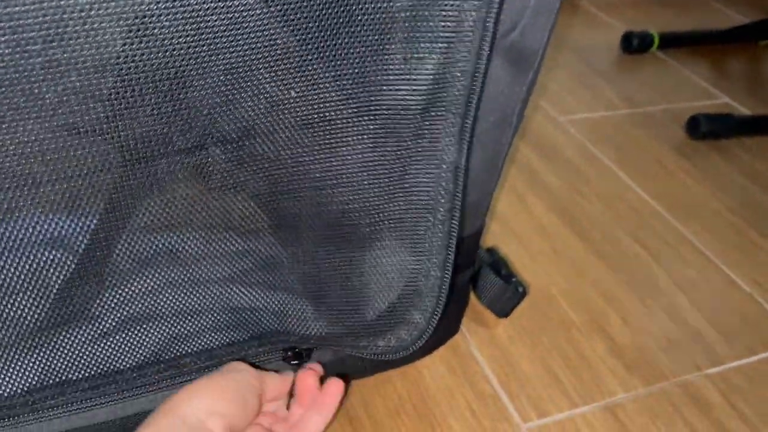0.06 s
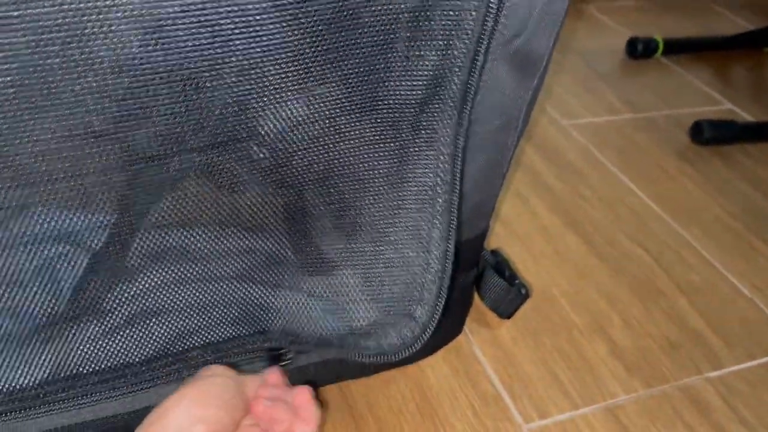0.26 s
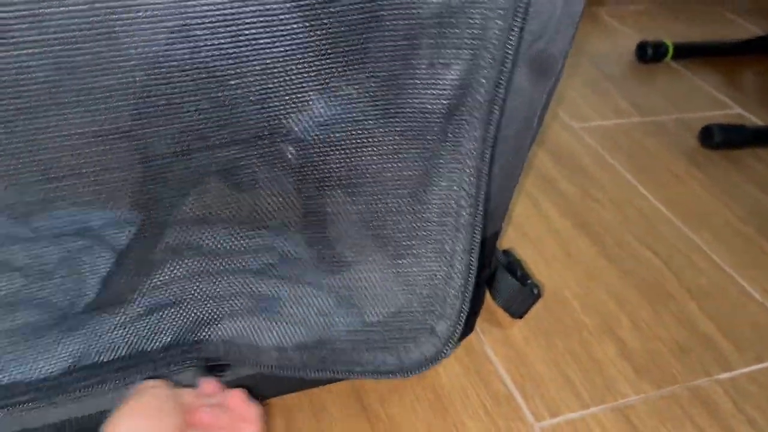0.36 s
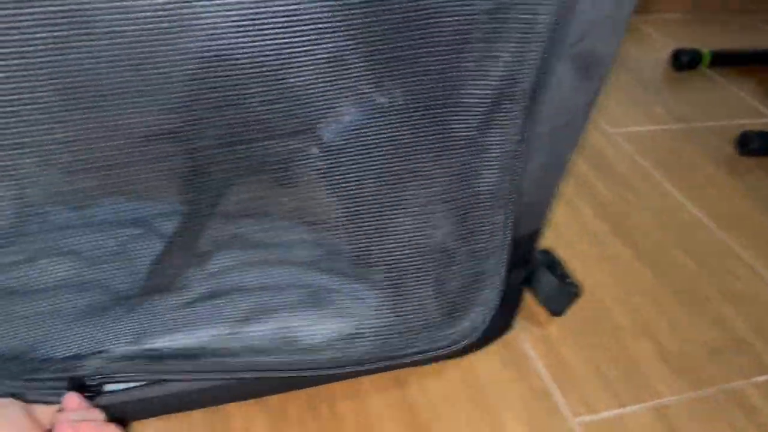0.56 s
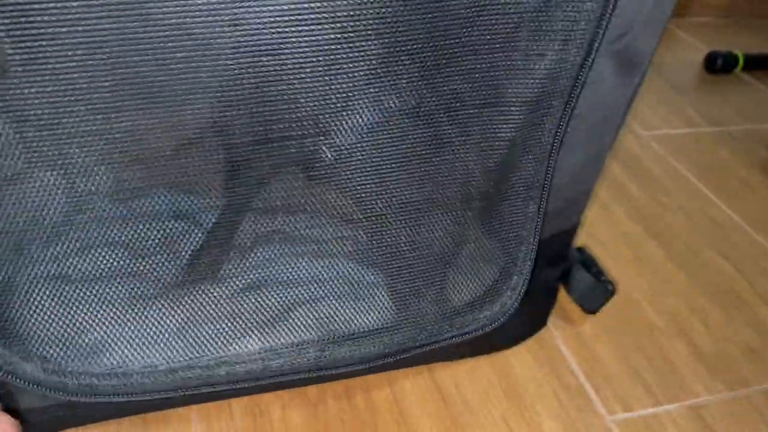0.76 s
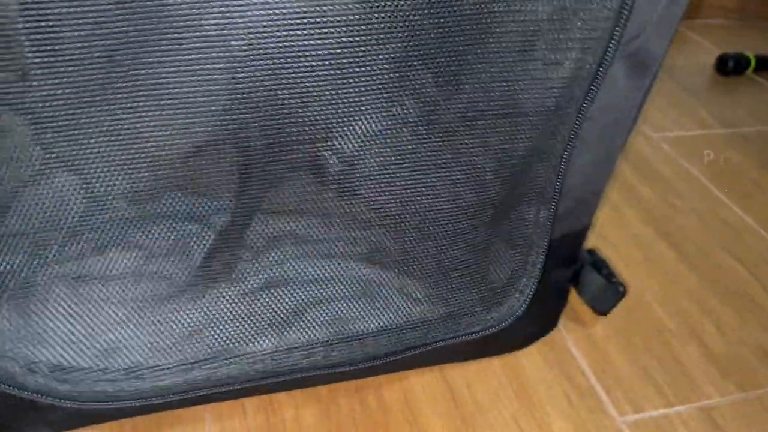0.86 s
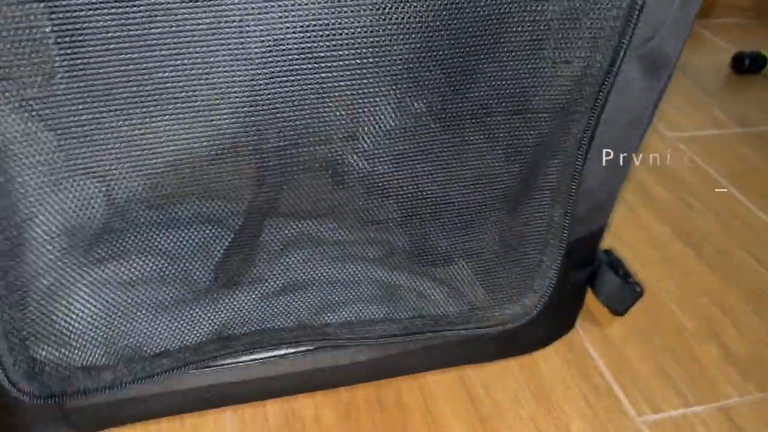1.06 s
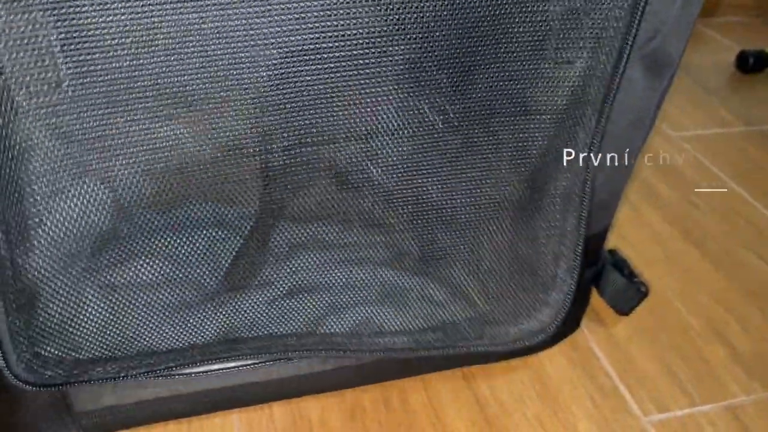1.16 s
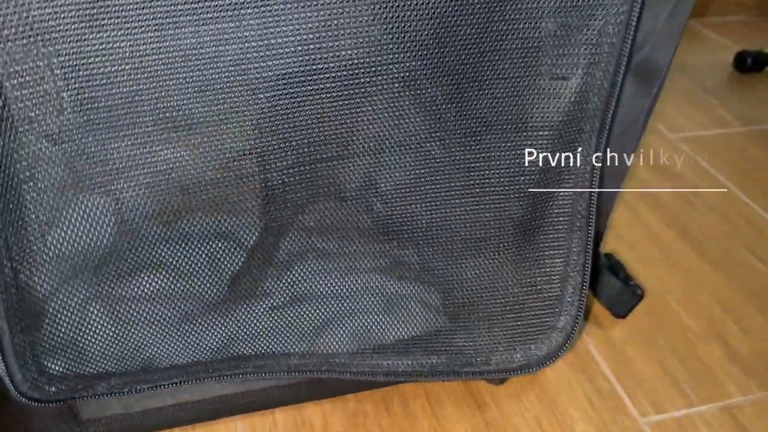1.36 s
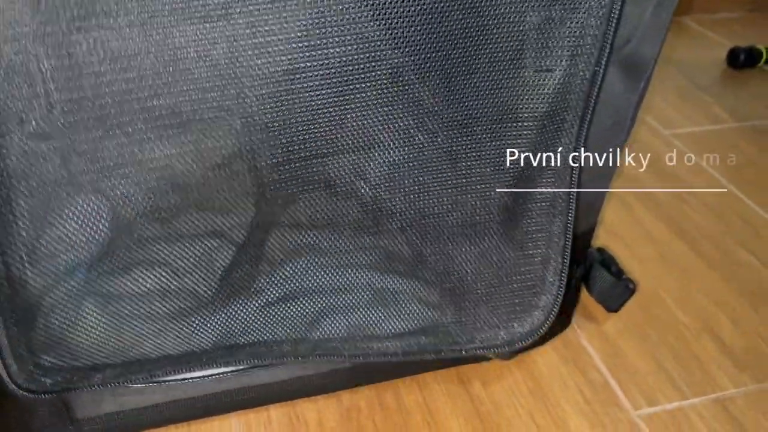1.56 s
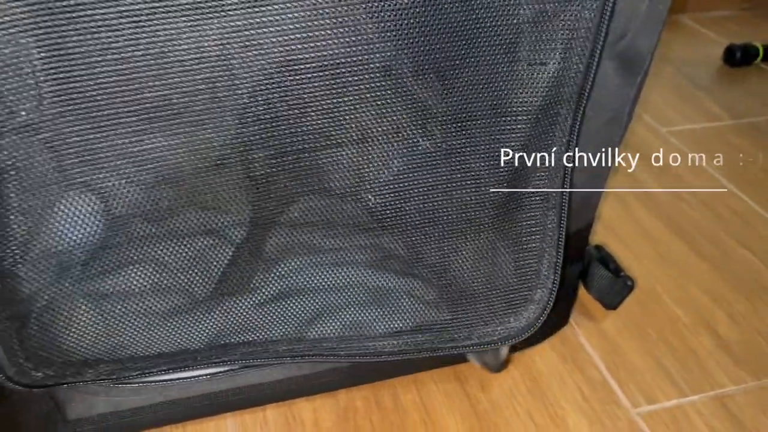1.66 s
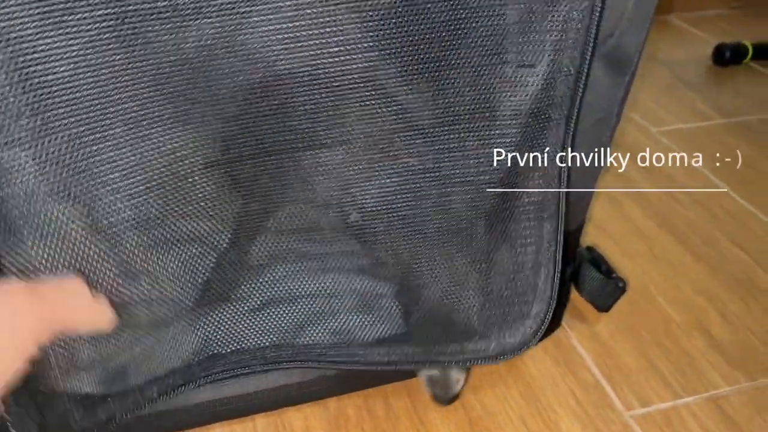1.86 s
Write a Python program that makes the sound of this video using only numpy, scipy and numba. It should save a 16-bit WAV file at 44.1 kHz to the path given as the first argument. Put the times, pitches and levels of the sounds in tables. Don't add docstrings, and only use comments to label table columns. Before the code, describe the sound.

A zipper on a fabric crate door opens close to a handheld microphone in a small, softly humming room. Faint finger ticks and rustle come first. From 0.2 to 0.65 seconds it buzzes, then teeth pop unevenly with a low thump near 0.74. A faster, brighter stroke runs from 0.85 to 1.27. The flap thuds softly; around 1.5 the tab clinks and cloth rustles.

```python
import sys
import numpy as np
from scipy import signal
from scipy.fft import rfft, irfft
from scipy.io import wavfile
from scipy.ndimage import uniform_filter1d, map_coordinates
from numba import njit

SR = 44100
rng = np.random.default_rng(int(sys.argv[2]) if len(sys.argv) > 2 else 0)


def boost_factor(decibels):
    exponent = np.asarray(decibels, float) / 20
    return 10 ** exponent


def dump(signal):
    limited = np.clip(np.atleast_2d(signal).T, -1, 1)
    pcm = np.round(limited * 32767).astype(np.int16)
    wavfile.write(sys.argv[1], SR, pcm)


N = 83790

SCRAPE_GATE_S = .008


def noise():
    return rng.standard_normal(N)


def level(x, db):
    return x * boost_factor(db) / np.sqrt(np.mean(x ** 2))


def colour(x, points):
    hz, db = np.array(points, float).T
    log_hz = np.log(np.linspace(1, SR / 2, 2049))
    cepstrum = irfft(np.interp(log_hz, np.log(hz), db) * np.log(10) / 20)
    cepstrum[1:2048] *= 2
    cepstrum[2049:] = 0
    response = irfft(np.exp(rfft(cepstrum)))
    return signal.fftconvolve(x, response)[:N]


def band(x, hz, width):
    return signal.lfilter(*signal.iirpeak(hz, hz / width, SR), x)


@njit
def glide(x, hz, q):
    y, b, l = np.empty(len(x)), 0., 0.
    for i in range(len(x)):
        g = np.tan(np.pi * hz[i] / SR)
        v = (b + g * (x[i] - l)) / (1 + g * (g + 1 / q))
        b, l, y[i] = 2 * v - b, l + 2 * g * v, v / q
    return y


def fade(x, tau_s):
    return signal.lfilter([1], [1, -np.exp(-1 / (tau_s * SR))], x)


def strikes(times, sizes):
    samples = (np.asarray(times) * SR).astype(int)
    return np.bincount(samples, np.broadcast_to(sizes, np.shape(times)), N)[:N]


def ring(t, hz, t60):
    return (t > 0) * np.sin(2 * np.pi * hz * t) * np.exp(-np.log(1000) * np.abs(t) / t60)


def walk(size):
    return level(uniform_filter1d(uniform_filter1d(noise(), size), size), 0)


def follow(t, table):
    at, *columns = np.array(table).T
    return [np.interp(t, at, column) for column in columns]


def hum():
    # pitch_hz, level_db
    hum_colour = [(30, -22.5), (50, 10), (100, -7.5), (145, 1), (400, -16), (5500, -33), (11000, -32),
                  (12300, -52)]
    swell = boost_factor(2.8 * level(uniform_filter1d(noise(), size=4000), 0))
    return level(colour(noise(), hum_colour), -53.5) * swell


def room(t, x):
    t60_s, gap_s, room_db = 0.23, 0.0035, -11
    # pitch_hz, level_db
    room_colour = [(100, 14.5), (400, 6), (900, 3.5), (3000, 0), (6000, 2.5), (12000, -5.5)]
    tail = noise() * (t > gap_s) * np.exp(-np.log(1000) * t / t60_s)
    tail = tail / np.sqrt(np.sum(tail ** 2))
    return boost_factor(room_db) * signal.fftconvolve(colour(x, room_colour), tail)[:N]


def cloth_rustle(t):
    # start_s, length_s, level_db
    moves = [
        (0, 0.007, -56),
        (0.082, 0.37, -60),
        (1.501, 0.085, -51),
        (1.572, 0.081, -51.5),
        (1.65, 0.068, -71),
        (1.769, 0.032, -62),
    ]
    # pitch_hz, level_db
    cloth_colour = [(200, 5.5), (600, 7.5), (1500, 3), (2800, -7), (5000, -8.5), (9000, -6.5), (11500, 6.5),
                    (13500, -43)]
    grains = noise() * boost_factor(3.3 * uniform_filter1d(noise(), size=100) * 10)
    shape = 0
    for at, length, db in moves:
        rise = np.clip((t - at) / 0.0024, 0, 1)
        fall = np.clip(1 - (t - at - length) / 0.052, 0, 1) ** 2
        shape = shape + boost_factor(db) * rise * fall
    return shape * level(colour(grains, cloth_colour), 0)


def flap_thumps(t):
    # start_s, peak_db, pitch_hz, t60_s
    thumps = [
        (0.736, -13, 319, 0.061),
        (1.269, -22.5, 166, 0.036),
        (1.259, -22, 309, .05),
        (1.277, -41.5, 76.5, 0.086),
        (1.307, -39, 183, .1),
        (1.325, -35, 169, 0.048),
        (1.352, -45, 181, 0.11),
        (1.568, -44, 152, 0.063),
        (1.625, -33.5, 307, 0.072),
    ]
    out = 0
    for at, db, hz, t60 in thumps:
        soft_start = np.clip((t - at) / 0.0055, 0, 1)
        out = out + boost_factor(db) * ring(t - at, hz, t60) * soft_start
    return out


def finger_ticks():
    # start_s, peak_db, centre_hz, length_s
    ticks = [(0.0572, -27.5, 11200, 0.00038), (0.1145, -36.5, 8400, 0.0015), (0.117, -45, 2140, 0.0022),
             (0.180, -38.5, 3340, .0008), (0.187, -38, 1480, 0.001), (1.442, -34.5, 2230, 0.0017),
             (1.509, -37.5, 6050, 0.0058), (1.511, -35, 2560, 0.0046), (1.528, -54.5, 6040, 0.00072),
             (1.558, -28.5, 7800, 0.0041), (1.583, -38.5, 2490, 0.014), (1.61, -40, 2860, 0.022),
             (1.745, -44, 4400, 0.0036)]
    out = 0
    for at, db, hz, length in ticks:
        burst = fade(strikes([at], 1.), length) * np.sign(noise())
        tick = band(burst, hz, 0.39 * hz)
        out = out + boost_factor(db) * tick / np.abs(tick).max()
    return out


def tab_ring(t):
    struck_s = 1.514
    # pitch_hz, level_db, t60_s
    tab_modes = [(4300, -39, 0.08), (4210, -45, 0.033), (8290, -36, 0.015), (10900, -36, 0.02),
                 (2190, -41, 0.029)]
    return sum(boost_factor(db) * ring(t - struck_s, hz, t60) for hz, db, t60 in tab_modes)


def teeth(t):
    wobble, jitter, smooth_rate = .011, .02, 220
    # time_s, teeth_per_s
    speed = [(.251, 145), (.275, 197), (.316, 224), (.374, 212), (.442, 240), (.488, 227), (.51, 199),
             (.572, 198), (.604, 213), (.645, 156), (.846, 195), (.9, 281), (.936, 338), (1.045, 310),
             (1.075, 251), (1.138, 241), (1.204, 254), (1.263, 170)]
    # start_s, end_s
    stall = (.647, .8505)
    single_teeth = [.202, 0.221, 0.2339, 0.243, .651, 0.659, 0.668, .682, .693, 0.701, 0.7092, 0.716, 0.72,
                    .726, 0.7296, 0.734, 0.7378, 0.7388, 0.742, 0.7468, 0.7506, 0.7543, 0.7604, 0.7657,
                    0.7718, 0.7781, .7853, 0.7919, 0.7989, .8046, 0.8114, 0.8164, 0.823, 0.829, 0.8348,
                    0.8397, .8457, .8508, 1.268]
    at, rate = np.array(speed).T
    moving = (t >= at[0]) & (t < at[-1]) & ((t < stall[0]) | (t > stall[1]))
    pace = np.interp(t, at, rate) * (1 + wobble * walk(size=700)) * moving
    passed = np.floor(np.cumsum(pace) / SR + .98)
    run = t[1:][np.diff(passed) > 0]
    uneven = smooth_rate ** 2 / np.interp(run, at, rate) ** 3
    run = run + jitter * rng.standard_normal(len(run)) * uneven
    return np.concatenate([single_teeth, run])


def mesh_thumps(t, push):
    slack_db = 1.8
    # pitch_hz, width_hz, level_db
    frame_modes = [(188, 92, -6), (321.5, 52, 4), (492, 39, -4), (624, 32, -8), (737, 70, -8.5),
                   (961, 99, -2), (1117, 175, -3), (1423, 630, -7)]
    # time_s, frame_db, panel_hz, panel_db
    mesh_course = [(.2, -35.5, 830, -41), (.25, -41, 420, -26.5), (.31, -35.5, 636, -31),
                   (.4, -44.5, 470, -25), (.48, -35.5, 510, -30), (.52, -35, 564, -32.5),
                   (.62, -36, 566, -29), (.66, -38, 410, -26), (.72, -40, 421, -23),
                   (.77, -30.5, 243, -30.5), (.81, -36.5, 515, -32), (.89, -37.5, 926, -31),
                   (.94, -31, 680, -36), (1.0, -40, 960, -27.5), (1.05, -41, 914, -27.5),
                   (1.1, -35.5, 796, -36), (1.2, -38.5, 487, -34), (1.275, -30, 292, -39.5)]
    frame_db, panel_hz, panel_db = follow(t, mesh_course)
    push = level(push, 0) + level(fade(push, SCRAPE_GATE_S) * noise(), -13)
    frame = 0
    for k, (hz, width, db) in enumerate(frame_modes):
        jerks = push * boost_factor(frame_db + slack_db * walk(size=900))
        frame = frame + (-1) ** k * boost_factor(db) * band(jerks, hz, width)
    frame = signal.sosfilt(signal.butter(2, 150, "high", fs=SR, output="sos"), frame)
    panel = glide(push * boost_factor(panel_db), panel_hz, 4.37)
    return boost_factor(14.0) * frame + boost_factor(14.5) * panel


def tooth_burst(hits, scrape_db):
    snap_s, roughness = .00032, .13
    tail = fade(fade(hits, snap_s), snap_s / 2)
    click = hits + roughness * tail * np.sign(noise())
    scrape = fade(hits, SCRAPE_GATE_S) * noise()
    return level(click, 0) + level(scrape, scrape_db)


def tooth_snaps(t, hit, knock):
    snap_scrape_db, knock_scrape_db = -6.5, 2
    # time_s, snap_db, dullness_db
    pull = [(0.2, -31.5, 3), (0.208, -33.5, 4), (0.3, -27, 3.5), (0.402, -36, 9.5), (0.602, -30.5, 5.5),
            (0.696, -28.5, 0.5), (0.734, -25, 0), (0.78, -33, 7.5), (0.94, -26, 0.5), (1.006, -30.5, 3.5),
            (1.028, -26, 2.5), (1.174, -24.5, 0), (1.18, -22, 0.5), (1.25, -22, -4.5), (1.27, -29, 1.5),
            (1.275, -30, 6.5)]
    # pitch_hz, level_db
    snap_colour = [(900, -40.5), (5500, -22), (7200, -18.5), (8700, 0.5), (11300, -3.5), (13000, -7.5),
                   (14500, -13.5), (15500, -4.5)]
    # pitch_hz, level_db
    knock_colour = [(500, -21.5), (1000, -7), (1600, -6.5), (2700, -4.5), (4000, -5.5), (5500, -9.5),
                    (7000, -5), (9000, -8.5)]
    # time_s, pitch_hz, level_db
    hollow = [
        (.2, 3240, -3),
        (.35, 3560, 3.5),
        (.5, 2620, -21),
        (.72, 1610, -24.5),
        (.82, 9030, 8),
        (.93, 5900, -4.5),
        (1.05, 7400, -1.5),
        (1.189, 2530, -21.5),
        (1.249, 5730, 1.5),
    ]
    # pitch_hz, width_hz, level_db
    slider_modes = [(8400, 1400, -13), (10960, 520, -9.5), (11800, 810, -16)]
    snap_db, dull_db = follow(t, pull)
    snap = level(colour(tooth_burst(hit, snap_scrape_db), snap_colour), -2.95)
    dull = level(colour(tooth_burst(knock, knock_scrape_db), knock_colour), -9) * boost_factor(dull_db)
    hollow_hz, hollow_db = follow(t, hollow)
    cupped = glide(level(tooth_burst(hit, knock_scrape_db), 0), hollow_hz, 4.) * boost_factor(hollow_db)
    body = 0
    for hz, width, db in slider_modes:
        body = body + level(band(tooth_burst(hit, snap_scrape_db), hz, width), db)
    return boost_factor(snap_db) * (snap + dull + cupped + body)


def floor_echo(t, x):
    # time_s, lag_ms, level_db
    bounce = [(.2, .45, -14), (.3, .37, -11), (.58, .39, -11), (.66, .57, -13), (.73, .57, -14),
              (.76, .38, -12), (.82, .33, -8), (.88, .5, -5), (.96, .72, -6), (1.0, .8, -16),
              (1.06, .33, -16), (1.1, .33, -12), (1.27, .35, -13)]
    lag_ms, echo_db = follow(t, bounce)
    late = map_coordinates(x, [(t - lag_ms / 1000) * SR], mode="nearest")
    return boost_factor(echo_db) * late


def zipper(t):
    when = teeth(t)
    scatter_db = (1.2, 1.2, 1.8)
    hit, knock, push = (strikes(when, boost_factor(db * rng.standard_normal(len(when)))) for db in scatter_db)
    bright = tooth_snaps(t, hit, knock)
    return bright + floor_echo(t, bright) + mesh_thumps(t, push)


def unlike_paths(t, x):
    # pitch_hz, level_db
    unshared_colour = [(60, -21), (300, -12), (1300, -2), (2400, -9), (4600, -7), (7500, -10), (10000, -24),
                       (15000, -14)]
    scatter = (noise() * np.exp(-t / .006))[:N // 20]
    scatter = scatter / np.sqrt(np.sum(scatter ** 2))
    spread = signal.fftconvolve(x * walk(size=2000), scatter)[:N]
    return colour(spread, unshared_colour) * np.array([[1], [-1]])


def ports(dry):
    # pitch_hz, level_db
    right = [(60, 0), (250, -2), (700, -6), (1300, -5), (2400, -3), (4400, -3), (8000, 0), (15000, 0)]
    # pitch_hz, lag_cycles
    left_lag = [(0, 0), (1050, -.14), (1400, -.62), (1700, -.8), (2700, -1.06), (5000, -1.08), (7000, -1),
                (8500, -.98), (10250, -.5), (11800, 0), (12800, .1), (13100, .5), (14400, .5), (14800, 1)]
    # pitch_hz, level_db
    port_colour = [(11600, 0), (12400, -4.5), (13200, -14.5), (14300, -6), (15500, -17)]
    hz = np.arange(N // 2 + 1) * SR / N
    turn = np.exp(-2j * np.pi * np.interp(hz, *np.array(left_lag).T))
    right_hz, right_db = np.array(right).T
    weaker = boost_factor(np.interp(np.log(hz + 1), np.log(right_hz), right_db))
    return [colour(irfft(rfft(x) * gain, N), port_colour) for x, gain in zip(dry, (turn, weaker))]


def scene():
    t = np.arange(N) / SR
    near = cloth_rustle(t) + flap_thumps(t) + finger_ticks() + tab_ring(t) + zipper(t)
    shared = hum() + room(t, near) + near
    return boost_factor(1.5) * (shared + unlike_paths(t, shared))


def band_limit(x):
    return signal.sosfilt(signal.butter(12, 17120, fs=SR, output="sos"), x)


def record(dry):
    low_cut_hz, top_hz, headroom = 36, 15700, .9
    both = signal.sosfilt(signal.butter(4, low_cut_hz, "high", fs=SR, output="sos"), ports(dry))
    both = headroom * np.tanh(both / headroom)
    both = signal.sosfilt(signal.ellip(12, .5, 70, top_hz, fs=SR, output="sos"), both)
    return band_limit(both)


dry = scene()
out = record(dry)
dump(out)
```